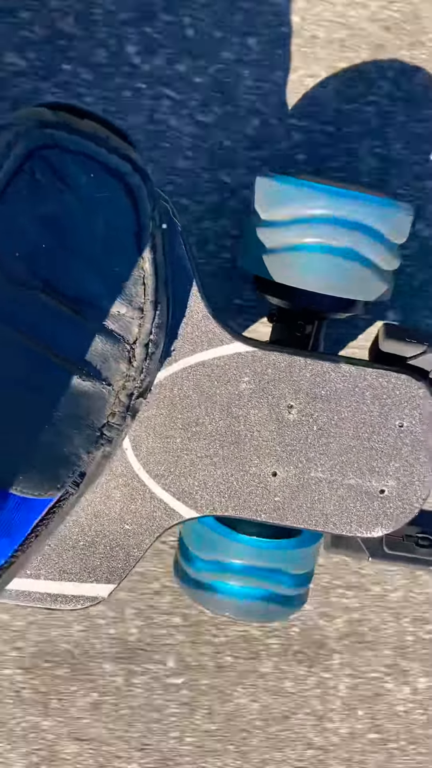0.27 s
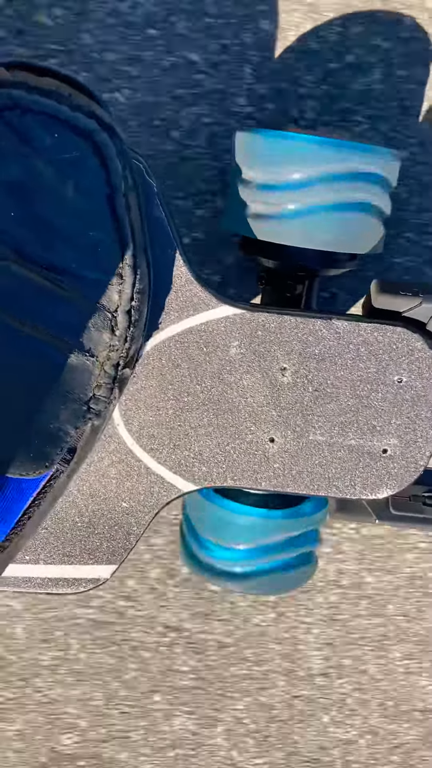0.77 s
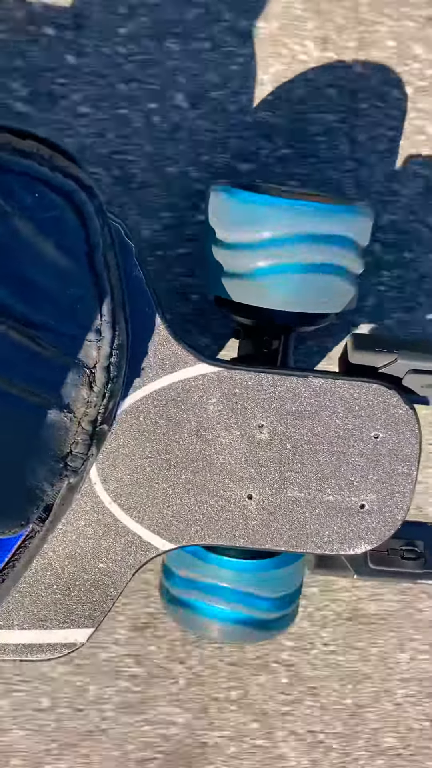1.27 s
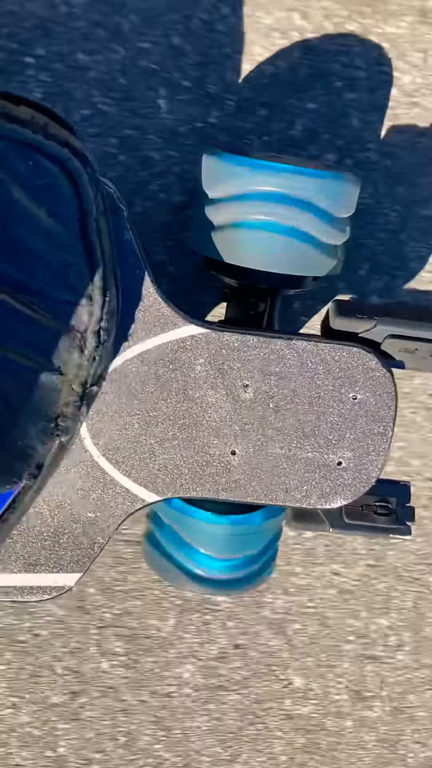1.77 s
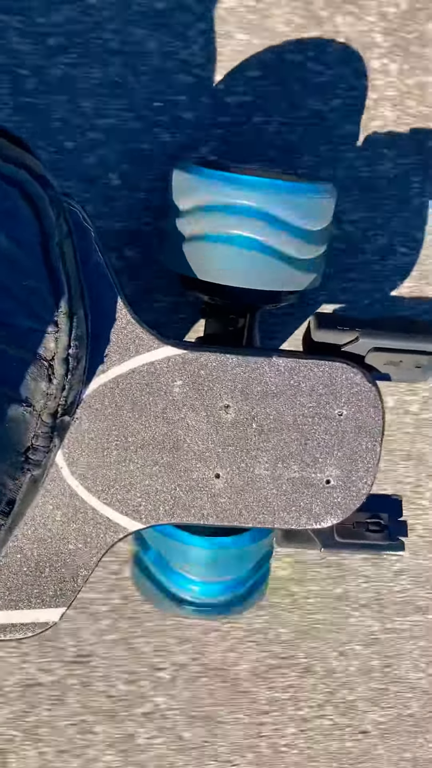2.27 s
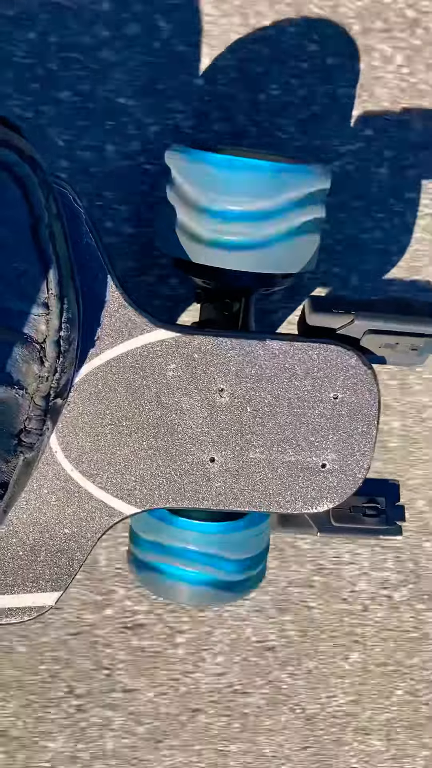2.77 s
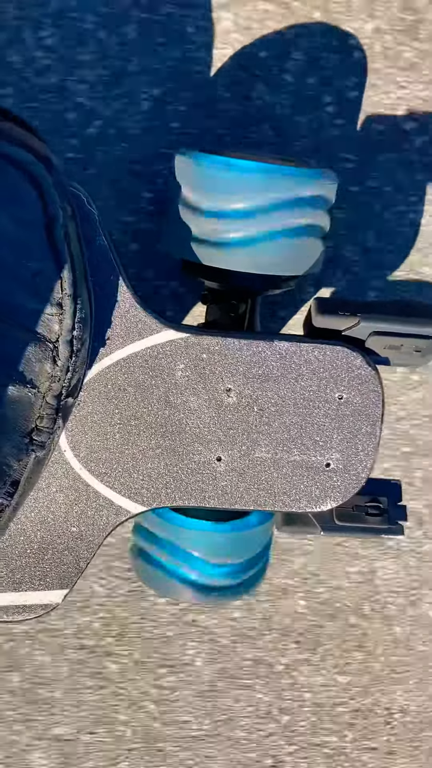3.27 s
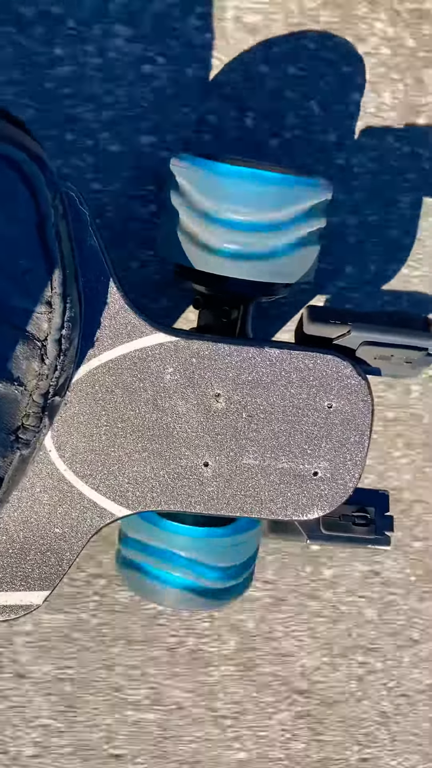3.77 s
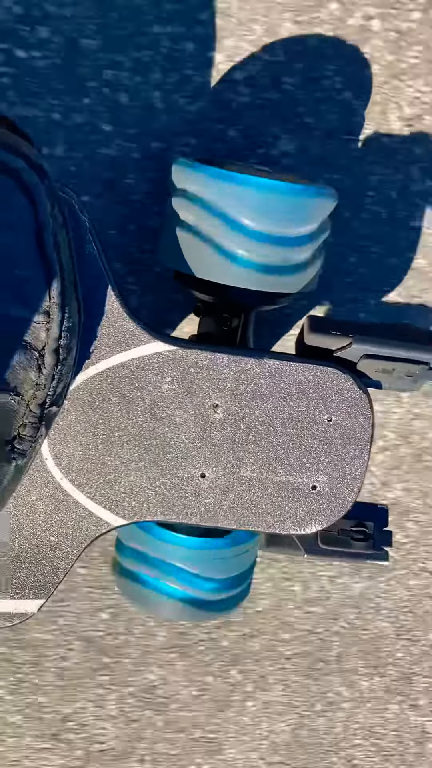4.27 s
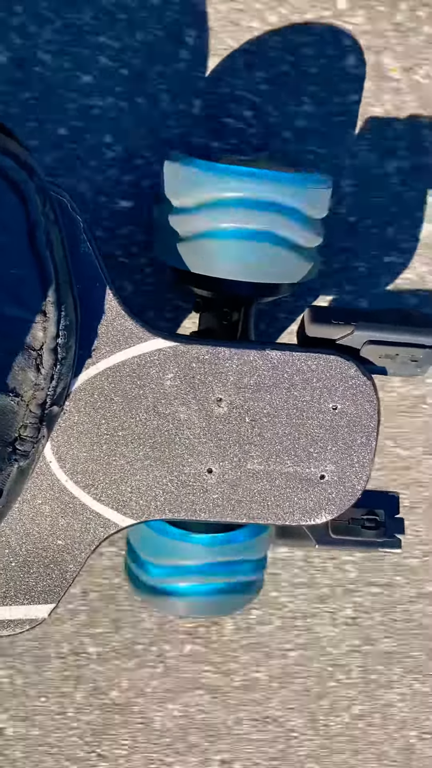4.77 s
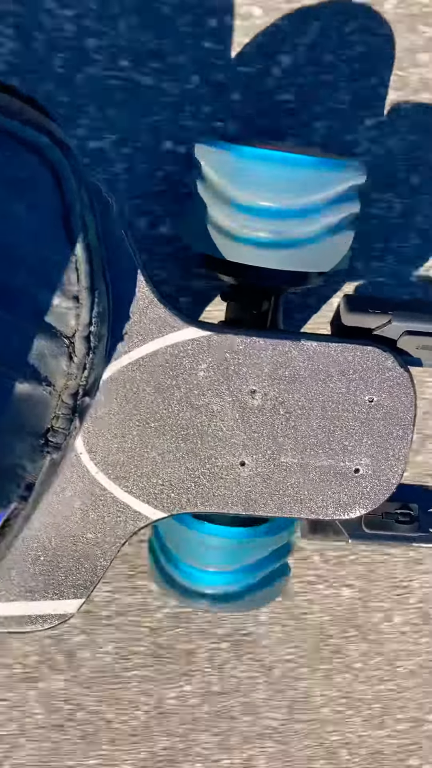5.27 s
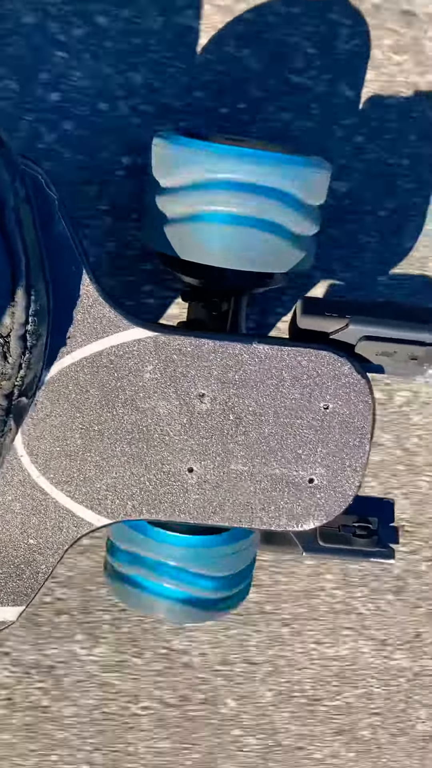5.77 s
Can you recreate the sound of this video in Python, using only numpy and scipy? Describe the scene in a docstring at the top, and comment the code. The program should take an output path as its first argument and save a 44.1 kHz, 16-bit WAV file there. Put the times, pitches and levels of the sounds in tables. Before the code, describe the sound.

Low rumbling wind flutter and crackling gusts nearly bury the grainy roll of skateboard wheels, a very thin high motor whine and occasional bright ticks.

```python
"""An electric skateboard rolls over rough asphalt; wind over the microphone dominates for 6 s.
From the start: filtered-noise rumble, flutter and rasp, short-pulse pops and knocks, a faint wheel hiss of
noise and random grains, and a whistle of narrow noise bands until 1.9 s and again from 3.6 to 5.6 s.
Chips (noise crack, sine ring) click at 0.16, 1.5, 2.2 and 5.7 s. Gusts (noise bursts, tearing front, late thump)
crowd in from 2.9 s; the strongest pop comes at 4.7 s, the strongest rasp near 5.25 s."""
import sys
import numpy as np
from scipy import signal
from scipy.fft import rfft, irfft, next_fast_len
from scipy.io import wavfile
from scipy.ndimage import uniform_filter1d, minimum_filter1d

SR = 44100
rng = np.random.default_rng(int(sys.argv[2]) if len(sys.argv) > 2 else 0)


def wav_record(signal):
    """Record a signal, one row per channel, as 16-bit PCM in the file named by sys.argv[1]."""
    frames = np.transpose(np.atleast_2d(signal))
    bounded = np.clip(frames, -1, 1)
    # unit amplitude maps onto the largest positive 16-bit level
    quanta = np.round(bounded * 32767).astype(np.int16)
    wavfile.write(sys.argv[1], SR, quanta)


N = 265570
T = np.arange(N) / SR
SIZE = next_fast_len(N, real=True)
HZ = np.fft.rfftfreq(SIZE, 1 / SR)


def amp(db):
    """Decibels to gain."""
    return 10 ** (np.asarray(db) / 20)


def unit(x):
    """Scales to rms 1."""
    return x / np.sqrt(np.mean(x ** 2) + 1e-20)


def colour(points):
    """Gain at every FFT frequency from (frequency [Hz], gain [dB]) points."""
    hz, db = np.transpose(points)
    return amp(np.interp(np.log(HZ + 1), np.log(hz), db))


def curve(rows):
    """Gain at every sample from (time [s], level [dB]) points."""
    return amp(np.interp(T, *np.transpose(rows)))


def flicker(rate_hz, depth_db):
    """Random gain of rms 1 that wanders up to about rate_hz."""
    noise = rfft(rng.standard_normal(N), SIZE)
    wander = irfft(noise / (1 + (HZ / rate_hz) ** 4), SIZE)[:N]
    return unit(amp(depth_db * np.clip(unit(wander), -2.2, 2.2)))


def swells(times_s, levels_db, durations_s):
    """Swells that rise a little faster than they die; their powers add."""
    power = np.zeros(N)
    for s, db, duration_s in zip(times_s, levels_db, np.maximum(durations_s, .004)):
        start = max(int((s - 2 * duration_s) * SR), 0)
        stop = max(int((s + 4 * duration_s) * SR), 0)
        u = (T[start:stop] - s) / duration_s
        shape = np.where(u < 0, np.exp(-3 * u ** 2), 1 / np.cosh(2.4 * u))
        power[start:stop] += (amp(db) * shape) ** 2
    return np.sqrt(power)


def patchy_noise(depth_db):
    """Two noises whose colour shifts at random, in patches about 10 ms long and 400 Hz wide."""
    z = signal.stft(rng.standard_normal((2, N)), nperseg=512, noverlap=384)[2]
    patches = rng.standard_normal(z.shape[1:])
    patches = uniform_filter1d(patches, size=5, axis=0)  # frequency
    patches = uniform_filter1d(patches, size=4, axis=1)  # time
    z = z * amp(depth_db * np.clip(unit(patches), -2, 2))
    return unit(signal.istft(z, nperseg=512, noverlap=384)[1][:, :N])


def ticks(per_s):
    """Two trains of separate ticks of uneven strength and random sign, falling at the same moments."""
    size = amp(2.7 * np.minimum(rng.exponential(1, N), 2))
    hits = rng.random(N) < per_s / SR
    return unit(size * hits * rng.choice([-1, 1], (2, N)))


def ports(drive, spectrum, width, alike=0.94):
    """Colours two drives into stereo; the side is part mid turned a quarter cycle, part independent."""
    mid, stray = rfft(drive, SIZE, axis=1) * colour(spectrum)
    alike = np.clip(alike, 0, 1)
    side = colour(width) * (1j * alike * mid + np.sqrt(1 - alike ** 2) * stray)
    mid, side = irfft(mid, SIZE)[:N], irfft(side, SIZE)[:N]
    return np.array([mid + side, mid - side]) / np.std(mid)


# wind stereo spread: (frequency [Hz], side re mid [dB])
WIND_SPREAD = [(20, -80), (600, -74), (850, -19), (1300, -4), (2000, -0.5), (3200, 2), (6000, 6),
               (9000, -1)]
CRACKLE_PER_S = 170


def turbulence(spectrum, rate_hz, rough_db, steady_hz=20, crackle=0):
    """Air pressure in quick packets of changing colour, optionally with ticks; slower swells evened out."""
    eddies = patchy_noise(4) + crackle * ticks(CRACKLE_PER_S)
    air = ports(eddies * flicker(rate_hz, rough_db), spectrum, WIND_SPREAD)
    window = signal.windows.hann(int(2 * SR / steady_hz))
    power = signal.fftconvolve((air ** 2).mean(0), window / window.sum(), "same")
    return air / np.sqrt(power + 0.0079)


POP_RING = 5  # higher: longer pulse, narrower band


def pulse(t, hz):
    """One sharp pressure swing of random phase, envelope peak at t = 0, spectrum broad around hz."""
    phase = np.exp(2j * np.pi * rng.random())
    return (phase / (1 - 2j * np.pi * hz * t / POP_RING) ** (POP_RING + 1)).real


# motor pull: (start [s], end [s])
PULLS = [(0, 1.88), (3.585, 5.61)]
# drive tones: (centre [Hz], width [Hz], rms level [dB])
WHISTLE = [(15372, 18, -67), (15652, 35, -64), (15400, 300, -52)]


def drive_whistle():
    """Thin, wavering switching tones while the motors pull: noise through narrow resonance lines."""
    pulling = sum(1. * ((T >= start_s) & (T < end_s)) for start_s, end_s in PULLS)
    pulling = uniform_filter1d(pulling, 300)
    noise, tones = rfft(rng.standard_normal(SIZE)), np.zeros(N)
    for hz, width_hz, db in WHISTLE:
        line = (1 + ((HZ - hz) / width_hz) ** 2) ** -2
        tones += amp(db) * unit(irfft(noise * line, SIZE)[:N])
    return pulling * tones


# stereo spread of hiss, scrubs and chip cracks: (frequency [Hz], side re mid [dB])
HISS_SPREAD = [(600, -49), (1000, 9), (2000, 8.5), (3200, 13), (4400, -1), (5500, 21.5), (6600, 4.5),
               (8000, -28), (10500, 4), (11700, 23), (14000, -8)]
# stone chips on the board: (time [s], blow level [dB], ring [Hz], ring re blow [dB])
CHIPS = [(.156, -30, 7600, -1), (1.471, -16, 8350, 8), (2.1648, -21.5, 9200, -5), (5.7387, -18, 8460, 10)]
# crack spectrum: (frequency [Hz], relative gain [dB])
CLICK = [(2000, -25), (4500, -3), (5500, -12), (8500, 5), (11500, -19), (15000, -14)]


def chips():
    """A flicked chip strikes the board: a short noise crack and a brief high sine ring."""
    crack, ring = np.zeros(N), np.zeros(N)
    t = T[:900]
    for s, db, hz, ring_db in CHIPS:
        at = int(s * SR)
        blow = amp(db) * (1 - np.exp(-t / .0004)) * np.exp(-t / .0014)
        crack[at:at + len(t)] += blow
        ring[at:at + len(t)] += amp(ring_db) * blow * np.sin(2 * np.pi * hz * t)
    return ring + amp(-3) * crack * ports(rng.standard_normal((2, N)), CLICK, HISS_SPREAD)


# rolling hiss: (time [s], relative level [dB])
ROLL = [(0, -60), (.3, -61), (.6, -53), (1.23, -53), (1.55, -56.5), (2.55, -54.5), (3.45, -61),
        (4.05, -53.5), (4.8, -56.5), (5.12, -53.5), (5.42, -59), (5.72, -54), (6.02, -56.5)]
# hiss spectrum: (frequency [Hz], relative gain [dB])
HISS = [(500, -20), (1100, -7), (2200, 1), (3300, -4), (4400, 3), (5500, -21.5), (6500, -0.5), (7500, -5),
        (8300, 3), (10200, -2.5), (11700, -27), (13500, -7), (16000, -11.5)]
# sideways scrub in steering corrections: (peak time [s], level [dB], duration [s])
SCRUBS = [(1.155, -47, 0.27), (1.167, -42, 0.031), (3.165, -55.5, 0.44), (4.026, -45, 0.032)]
# scrub spectrum: (frequency [Hz], relative gain [dB])
SCRUB_TONE = [(3000, -7), (3900, 3), (4450, 5), (5000, 1), (5500, -15), (6500, 5.5), (8000, -1),
              (9500, -26), (12000, -32)]


def wheels():
    """Asphalt stones tick under the wheels: hiss plus larger grains, throbbing with each turn; scrubs."""
    grit_per_s, grit_spread_db, turns_hz, crush_s = 260, 4.5, 14.8, 0.0018
    size = amp(grit_spread_db * np.minimum(rng.exponential(1, N), 3.2))
    grit = size * (rng.random(N) < grit_per_s / SR)
    crush = np.exp(-T[:400] / crush_s)
    grains = unit(np.sqrt(abs(signal.fftconvolve(grit ** 2, crush ** 2)[:N])))
    throb = 1 + 0.16 * np.sin(2 * np.pi * turns_hz * T)
    drive = patchy_noise(2.5) * np.hypot(.55, 0.57 * grains) * flicker(150, 1.0) * throb
    hiss = amp(9.5) * curve(ROLL) * ports(drive, HISS, HISS_SPREAD)
    scrub = swells(*np.transpose(SCRUBS)) * ports(drive * flicker(90, 1.0), SCRUB_TONE, HISS_SPREAD)
    return hiss + scrub


# airstream strength, also drives knocks: (time [s], relative level [dB])
AIR = [(0, -16), (.6, -17.5), (1.0, -20.5), (1.12, -16.5), (1.4, -19.5), (1.75, -13.5), (2.2, -19.5),
       (2.47, -22), (2.62, -13.5), (2.92, -16), (3.25, -18), (3.85, -18.5), (4.24, -19), (4.55, -11.5),
       (4.8, -24.5), (5.0, -18), (5.3, -13), (6.02, -23.5)]
# slack airstream: centre time [s]
LULLS = [.47, 1.005, 1.99, 2.499, 2.67, 3.21, 3.95, 4.015, 4.245, 4.345, 4.79, 5.034, 5.905]
LULL_DB, LULL_S = -7, 0.019
# rasp: (time [s], relative level [dB])
RASP = [(0, -47), (.7, -51.5), (1.6, -48), (2.35, -41.5), (2.72, -41.5), (3.05, -55.5), (4.5, -40.5),
        (4.95, -37.5), (5.25, -32.5), (6.02, -48)]
# spectra, TEAR also for gusts: (frequency [Hz], relative gain [dB])
RUMBLE = [(15, -55), (28, -34), (42, -7.5), (60, 0.5), (120, -3.5), (200, -10), (400, -16), (800, -32),
          (3000, -105)]
FLUTTER = [(60, -30), (200, -1.5), (400, 3.5), (700, -4), (1100, -2), (1500, -22), (2200, -36), (3500, -53),
           (8000, -88)]
TEAR = [(250, -13), (700, 13.5), (1200, 11), (1800, 5), (2600, -4.5), (3500, -20), (4600, -25), (6000, -55),
        (12000, -61)]


def buffeting():
    """Airstream turbulence in three bands: rumble and flutter that fall slack in lulls, and a rasp."""
    slack = sum(np.exp(-((T - s) / LULL_S) ** 2) for s in LULLS)
    air = curve(AIR) * amp(LULL_DB * slack)
    rumble = amp(1.6) * air * turbulence(RUMBLE, 38, 4.1, steady_hz=22.0)
    flutter = amp(-10) * air * turbulence(FLUTTER, 150, 3.4, steady_hz=11.6)
    rasp_air = turbulence(TEAR, 120, 3.6, steady_hz=16.0, crackle=0.61)
    rasp = amp(7.5) * curve(RASP) * flicker(35, 2.8) * rasp_air
    return rumble + stalls() * (flutter + rasp)


KNOCKS_PER_S, KNOCK_LOW_HZ, KNOCK_HIGH_HZ = 53, 267, 706
KNOCK_DB, KNOCK_SPREAD_DB = -3.5, 2.5  # re airstream


def knocks():
    """Eddies knock on the microphone at random times; low ones are longer and on average stronger."""
    out, air = np.zeros(N), curve(AIR)
    for place, size, pitch in rng.random((int(KNOCKS_PER_S * N / SR), 3)):
        at = int(place * (N - 1))
        near = slice(max(at - 400, 0), at + 400)
        hz = KNOCK_LOW_HZ * (KNOCK_HIGH_HZ / KNOCK_LOW_HZ) ** pitch
        db = KNOCK_DB + KNOCK_SPREAD_DB * (2 * size + 0.5 - pitch)
        out[near] += air[at] * amp(db) * pulse(T[near] - T[at], hz)
    return out


# gusts, relative levels: (body peak [s], body [dB], duration [s], tear [dB], thump [dB])
GUSTS = [(0.39, -11, 0.018, -23.5, -27), (0.741, -22, 0.039, -43, -18.5), (1.715, -2, 0.0092, -22, -23),
         (1.748, -9.5, 0.0075, -25, -14.5), (1.771, -13.5, 0.018, -37, -19), (2.009, -6.5, 0.01, -32, -34),
         (2.13, -7.5, 0.023, -23.5, -12.5), (2.195, -14, 0.059, -30.5, -21),
         (2.325, -17, 0.031, -33.5, -17.5), (2.688, -20, 0.025, -30.5, -23),
         (2.883, -19.5, 0.013, -37, -10), (3.006, -9.5, 0.025, -28.5, -8.5), (3.139, -20, 0.014, -45, -8),
         (3.341, -2.5, 0.013, -24.5, -7), (3.457, -12.5, 0.022, -31, -11.5),
         (3.551, -5.5, 0.019, -23.5, -19), (3.589, -11.5, 0.022, -31, -33), (3.805, -17.5, 0.038, -47, -14),
         (3.899, -14, 0.03, -32, -27), (3.98, -13.5, 0.023, -26.5, -31), (4.037, -7.5, 0.0096, -19.5, -8.5),
         (4.127, -16, 0.028, -33, -6), (4.285, -21, 0.025, -26.5, -8), (4.376, -35, 0.014, -23, -13),
         (4.4, -11.5, 0.022, -35, -22), (4.682, -15, 0.016, -25.5, -11), (4.703, -16, 0.011, -14.5, -17),
         (4.735, -18.5, 0.015, -27, -11), (4.808, -17, 0.015, -44, -11.5), (4.841, -39, 0.0067, -21.5, -38),
         (5.191, -12.5, 0.012, -31.5, -17), (5.278, -5, 0.007, -23, -16), (5.345, -14, 0.011, -25.5, -9),
         (5.38, -17, 0.049, -29, -32), (5.486, -27, 0.013, -17, -7), (5.521, -15, 0.035, -22, -38),
         (5.665, -16, 0.028, -20.5, -9), (5.727, -18, 0.01, -41, 5.5), (5.737, -31, 0.023, -17, -38),
         (5.828, -15, 0.015, -25.5, -8.5), (5.945, -18, 0.029, -25.5, -4.5)]
# slow eddies that only thump: (peak time [s], relative level [dB])
THUMPS = [(.385, -10), (.525, -16), (1.1, -7), (1.275, -15), (1.47, -9), (2.04, -14), (2.595, -10),
          (2.83, -4.5), (3.055, -8.5), (3.31, -12.5), (3.865, -12.5), (3.92, -10), (3.985, -11.5),
          (4.185, -6), (4.6, -12), (5.08, -8), (5.22, -12), (5.305, -12), (5.667, -5)]
# spectra: (frequency [Hz], relative gain [dB])
GUST = [(50, -16), (200, -2.5), (450, 1.5), (750, -2), (1100, -7.5), (1500, -14.5), (2200, -28),
        (4000, -72), (9000, -99)]
SNAP = [(1200, -17), (2700, 1.5), (3500, 2.5), (4300, -6), (5200, -23), (10000, -28.5)]
THUMP = [(15, -49), (30, -24), (55, -0.5), (120, -3.5), (200, -8), (400, -19.5), (900, -34), (3000, -87)]
TEAR_LEAD_S, WAKE_LAG_S, THUMP_S = 0.00088, 0.012, 0.02
WAKE_LAG_PER_LENGTH = 0.23  # extra lag [s] per s of gust


def gusts():
    """A gust tears at the port just ahead of its crackling body and leaves a low thump in its wake."""
    s, body_db, length_s, tear_db, thump_db = np.transpose(GUSTS)
    body = swells(s, body_db, length_s) * turbulence(GUST, 247, 3.2, steady_hz=79.0, crackle=1)
    force = swells(s - TEAR_LEAD_S, tear_db, length_s)
    tear = force * turbulence(TEAR, 450, 4.0, steady_hz=50, crackle=0.38)
    snap = force ** 2 * turbulence(SNAP, 220, 2.5, steady_hz=70)  # top grows faster than the force
    wake = swells(s + WAKE_LAG_S + WAKE_LAG_PER_LENGTH * length_s, thump_db, length_s)
    slow = swells(*np.transpose(THUMPS), np.full(len(THUMPS), THUMP_S))
    thump = np.hypot(wake, slow) * turbulence(THUMP, 76, 1.8, steady_hz=51.0)
    return stalls() * (body + amp(8.5) * tear) + amp(12.5) * snap + amp(2.5) * thump


# eddies breaking on the port, low jolts to high pops: (time [s], level [dB], pitch [Hz])
POPS = [(.1131, -8, 580), (.1733, -4.5, 694), (.2573, -7, 560), (.391, -3, 1200), (.3998, -8, 980),
        (.7451, -3.5, 723), (.866, -7, 534), (1.1575, -3.5, 458), (1.2888, -5, 500), (1.328, -15, 990),
        (1.7141, -4, 842), (1.733, -2, 700), (1.8015, -4.5, 885), (1.8675, -8, 621), (2.009, 1.5, 600),
        (2.1355, -5, 900), (2.1988, -1, 800), (2.3241, -8, 723), (2.5901, 0.5, 280), (2.6766, -6.5, 621),
        (2.8201, 6, 320), (2.882, -3, 458), (2.929, -6, 700), (3.0025, -10, 621), (3.0398, -1, 540),
        (3.1411, -8, 723), (3.1739, -3.5, 330), (3.3475, 2, 800), (3.4647, -10, 1400), (3.5476, -15, 500),
        (3.5574, -6, 1000), (3.5856, 3, 621), (3.7973, -2.5, 723), (3.9039, -8, 842), (3.9751, -9, 1400),
        (4.0414, -3.5, 1800), (4.1161, -10.5, 1200), (4.1414, -12.5, 338), (4.3763, -6, 1600),
        (4.3938, -11, 280), (4.702, 11, 1270), (5.1173, -3.5, 621), (5.186, -7, 1050), (5.229, -2, 900),
        (5.2517, 0, 400), (5.2767, 1, 650), (5.2995, 5, 615), (5.329, -4, 400), (5.355, 1, 500),
        (5.3742, -1, 800), (5.487, -17, 1700), (5.5158, -13, 1328), (5.6495, 9, 723), (5.7209, -13, 842),
        (5.956, -1, 723)]
STALL_DB, STALL_LEAD_S, STALL_S = -3, 0.0084, 0.0047


def stalls():
    """Gain of the fine turbulence, which stalls for a moment before each eddy breaks."""
    times_s = [row[0] - STALL_LEAD_S for row in POPS]
    near = swells(times_s, np.zeros(len(POPS)), np.full(len(POPS), STALL_S))
    return amp(STALL_DB * np.minimum(near, 1))


# dry cracks: (time [s], level before dulling [dB])
CRACKS = [(.259, -28), (.389, -30), (1.731, -15), (3.554, -24), (4.0435, -21), (4.703, -10), (5.351, -21),
          (5.4895, -22), (5.728, -19)]
CRACK_HZ, POP_TOP_HZ = 2986, 3760


def pops():
    """Breaking eddies give pulses: pops, jolts and dry cracks, dulled by the port; side a quarter cycle off."""
    mid = np.zeros(N)
    cracks = [(s, db, CRACK_HZ) for s, db in CRACKS]
    for s, db, hz in POPS + cracks:
        near = slice(int((s - .01) * SR), int((s + .01) * SR))
        mid[near] += amp(db) * pulse(T[near] - s, hz)
    dulled = rfft(mid, SIZE) / (1 + (HZ / POP_TOP_HZ) ** 8)
    mid, side = irfft([dulled, 1j * dulled * colour(WIND_SPREAD)], SIZE)[:, :N]
    return np.array([mid + side, mid - side])


def scene():
    """Wind at the microphone over the board below."""
    board = drive_whistle() + chips() + wheels()
    wind = buffeting() + stalls() * knocks() + gusts() + pops()
    return board + wind


LOW_CUT_HZ, EDGE_HZ = 30, 15950


def record(dry):
    """Low cut, fast peak limiter with one gain for both channels, then band limit."""
    low_cut = np.sqrt(1 + (LOW_CUT_HZ / (HZ + 1)) ** 8)
    dry = irfft(rfft(dry, SIZE) / low_cut, SIZE)[:, :N]
    ceiling = .9
    allowed = ceiling / np.maximum(abs(dry).max(0), ceiling)
    gain = uniform_filter1d(minimum_filter1d(allowed, size=221), size=221)  # 5 ms
    band = signal.firwin(511, EDGE_HZ, window=("kaiser", 9), fs=SR)
    return signal.oaconvolve(dry * gain, band[None], "same")


dry = scene()
out = record(dry)
wav_record(out)
```